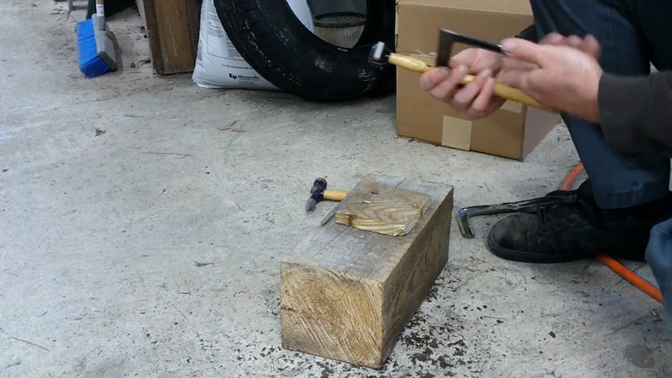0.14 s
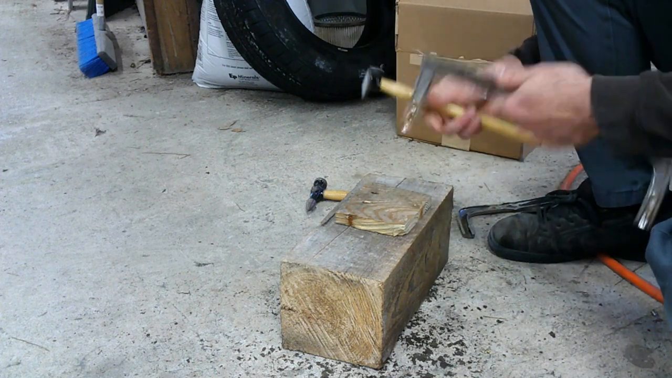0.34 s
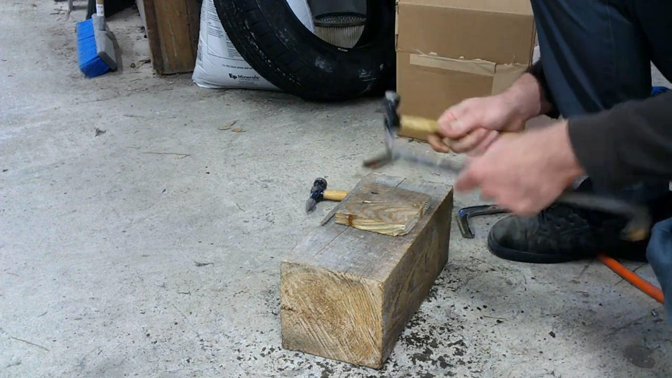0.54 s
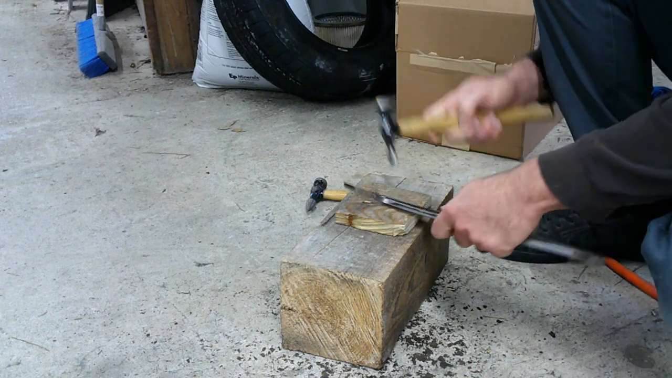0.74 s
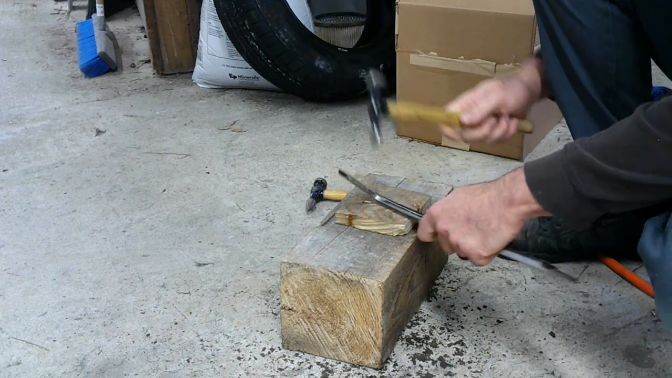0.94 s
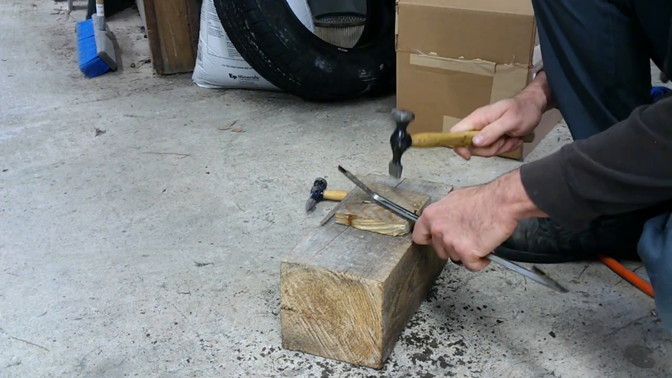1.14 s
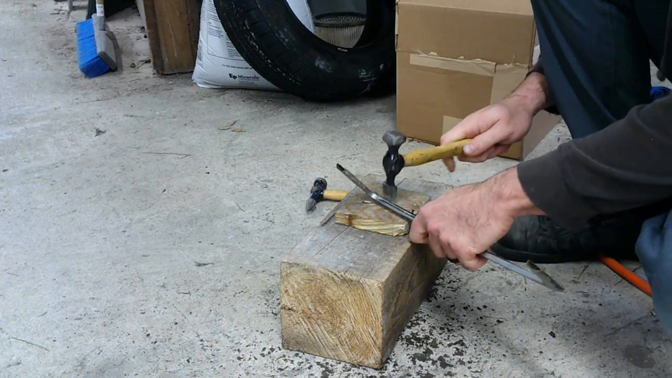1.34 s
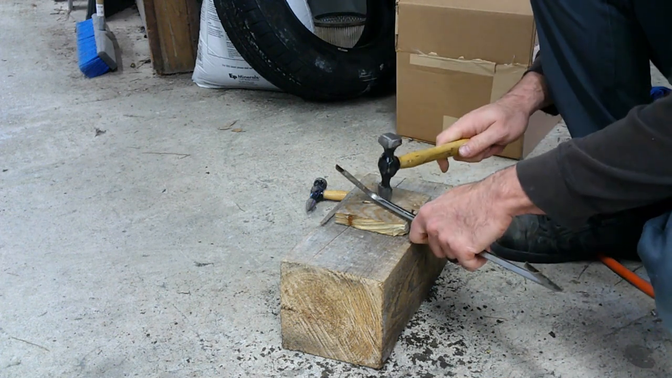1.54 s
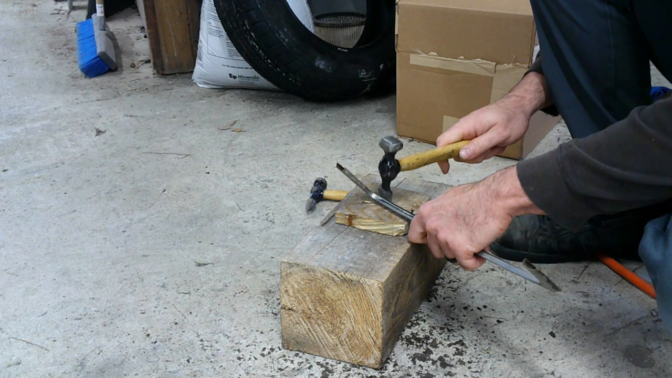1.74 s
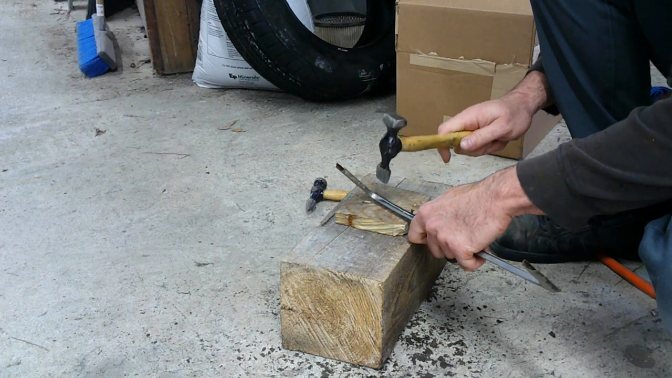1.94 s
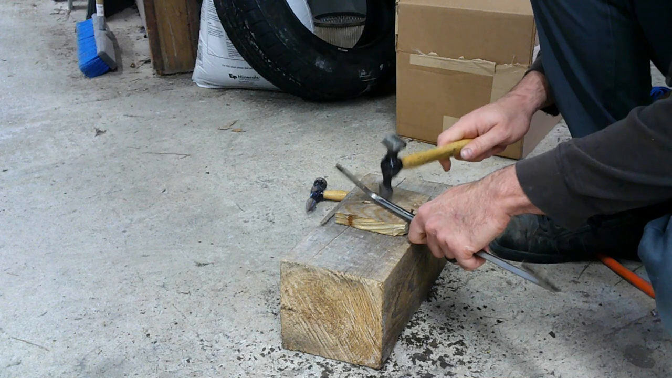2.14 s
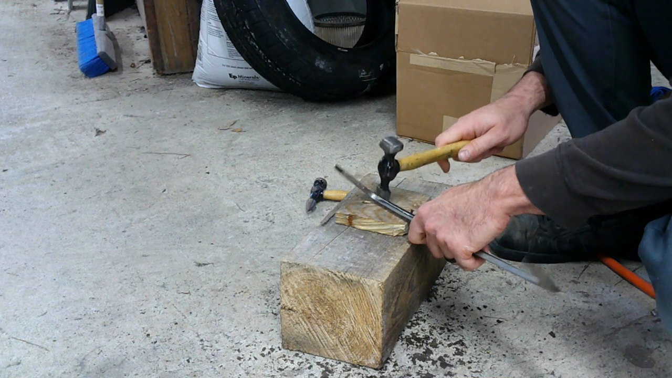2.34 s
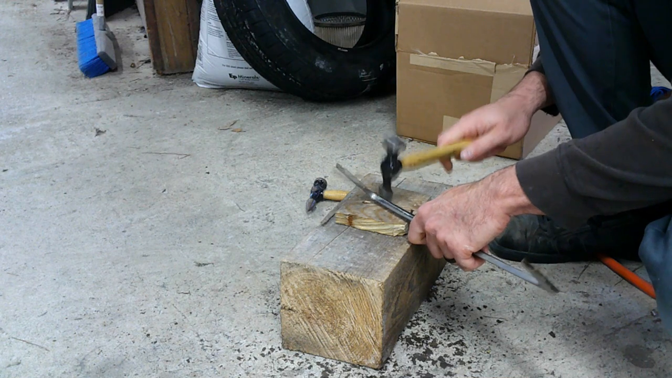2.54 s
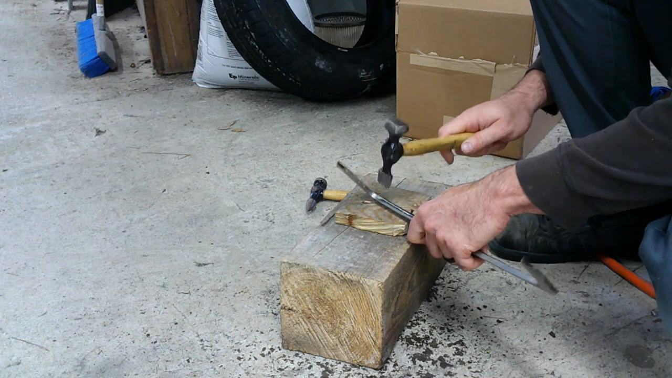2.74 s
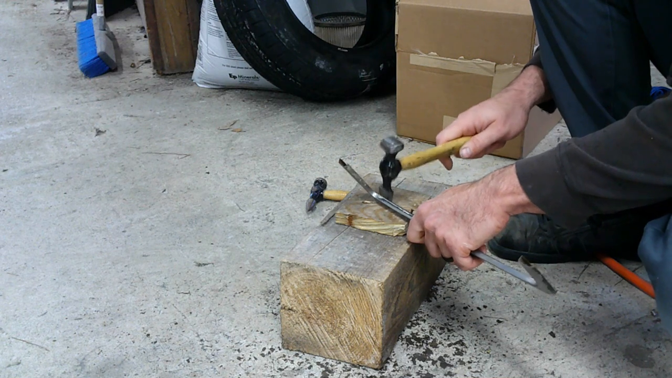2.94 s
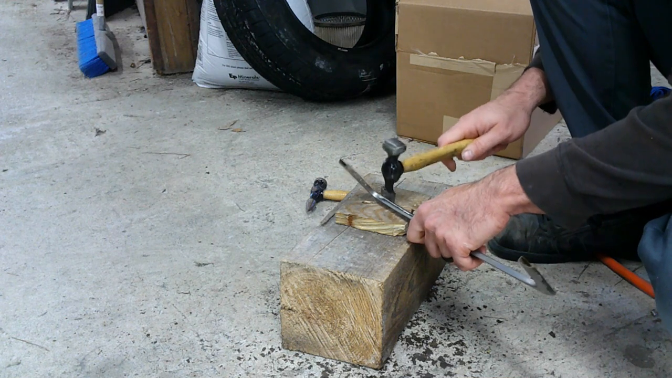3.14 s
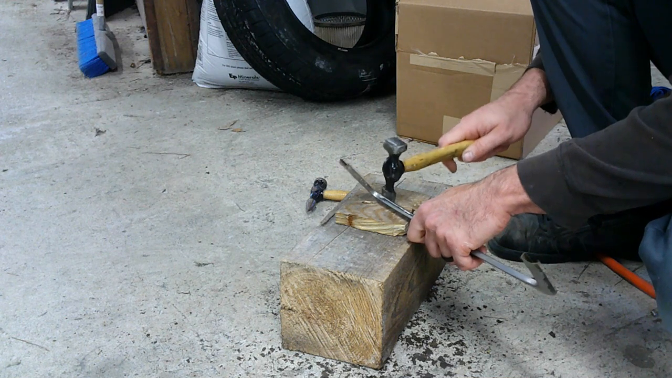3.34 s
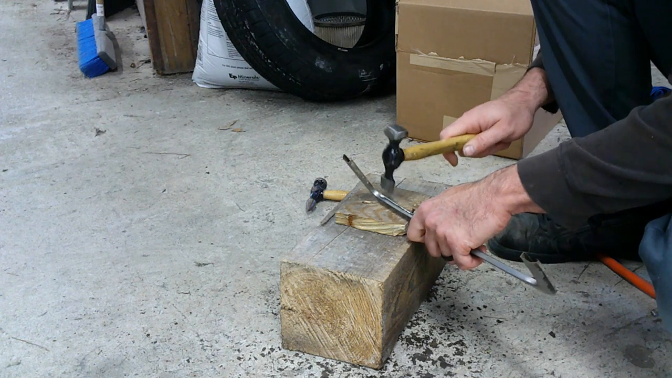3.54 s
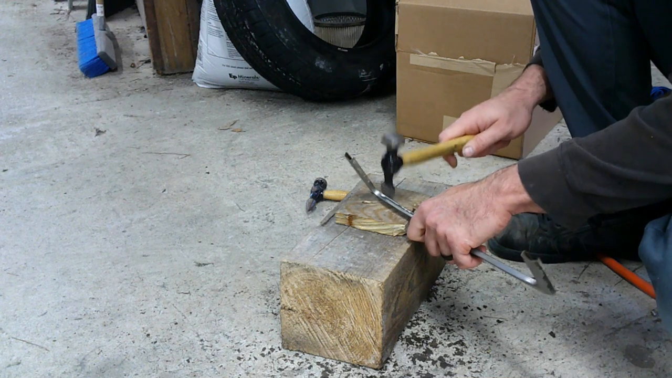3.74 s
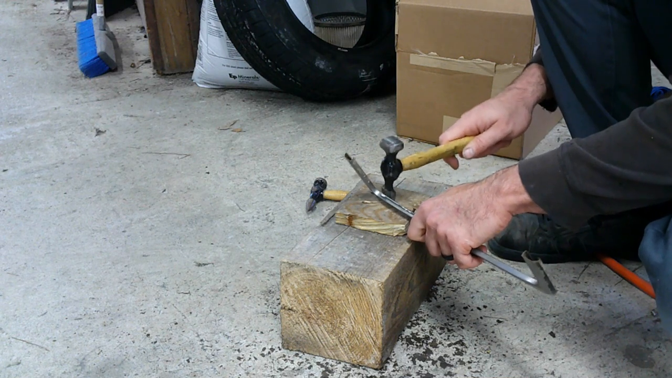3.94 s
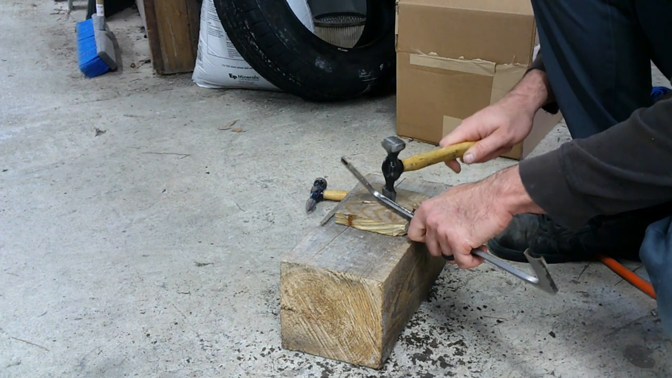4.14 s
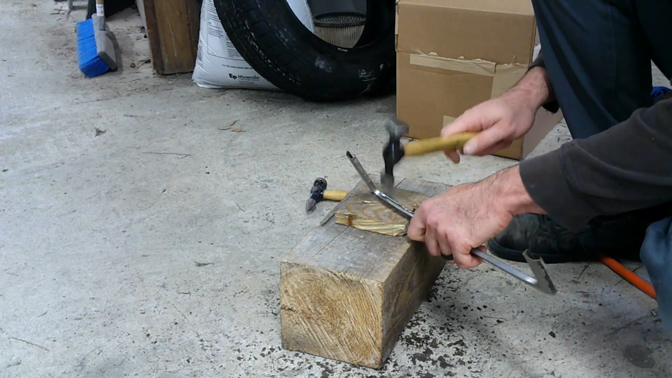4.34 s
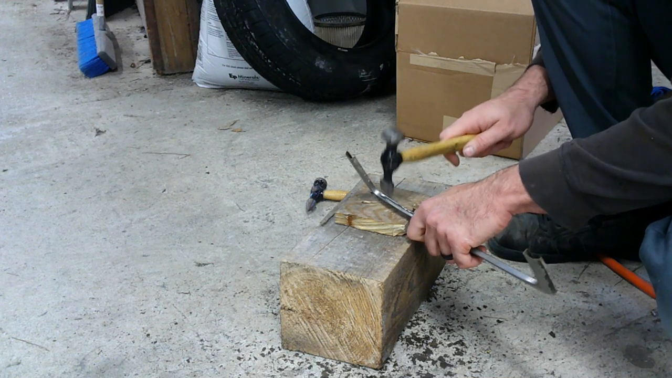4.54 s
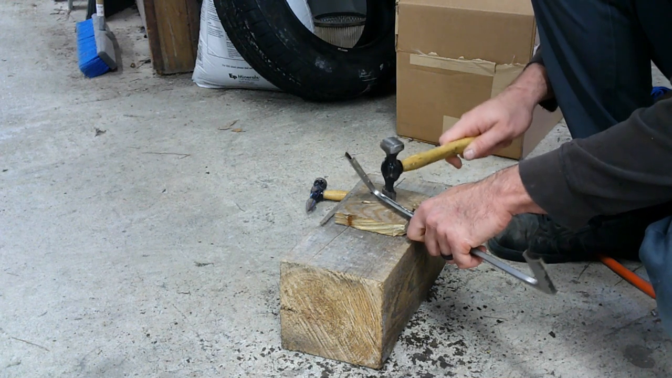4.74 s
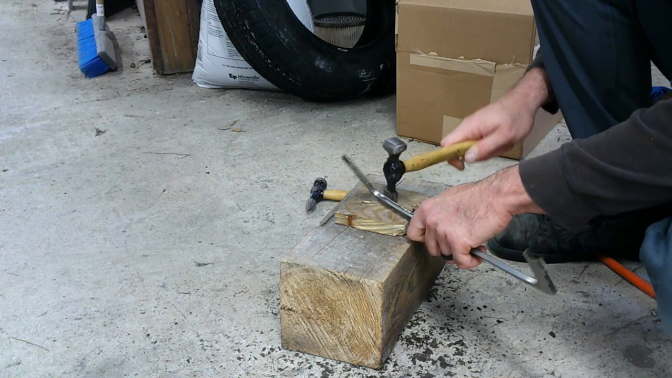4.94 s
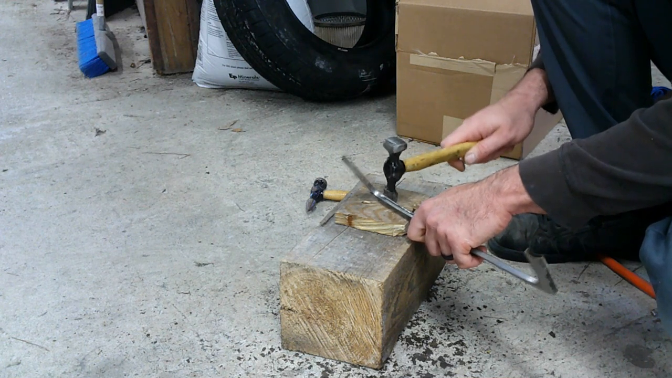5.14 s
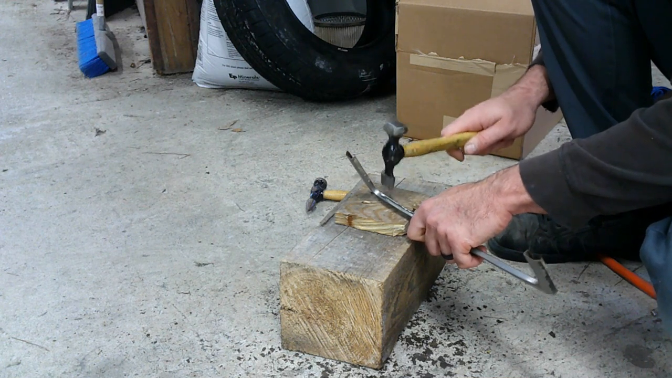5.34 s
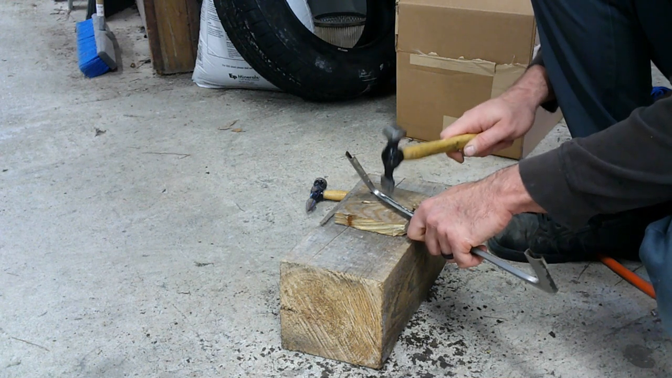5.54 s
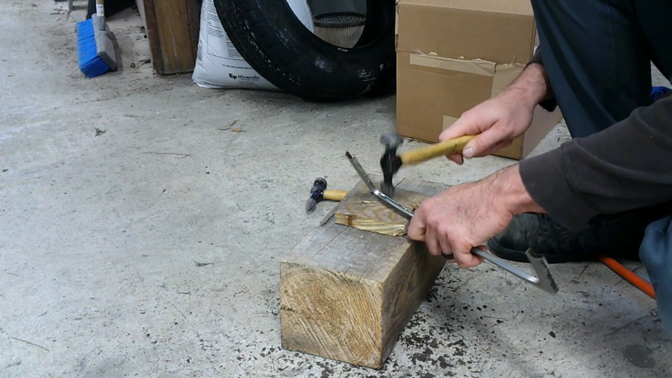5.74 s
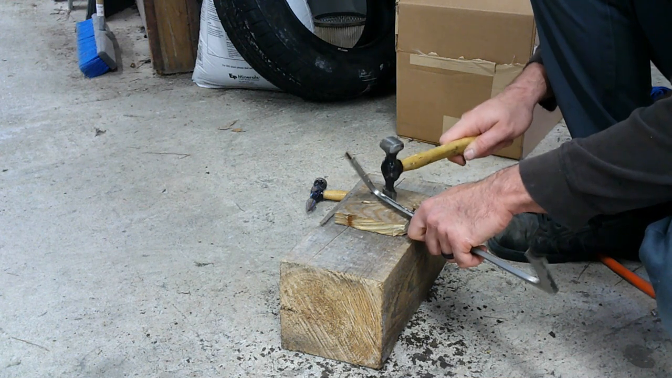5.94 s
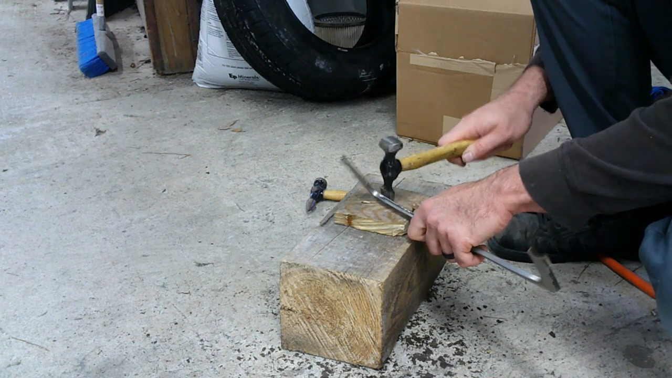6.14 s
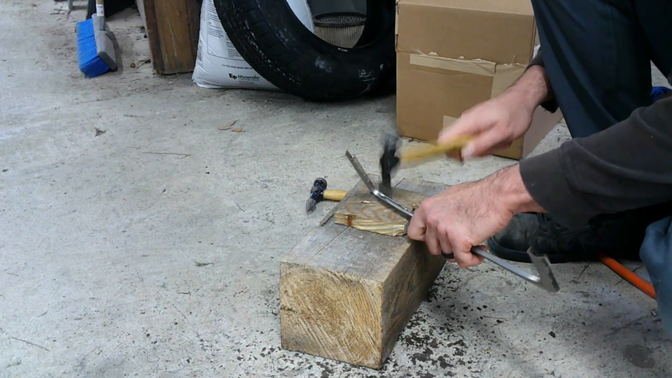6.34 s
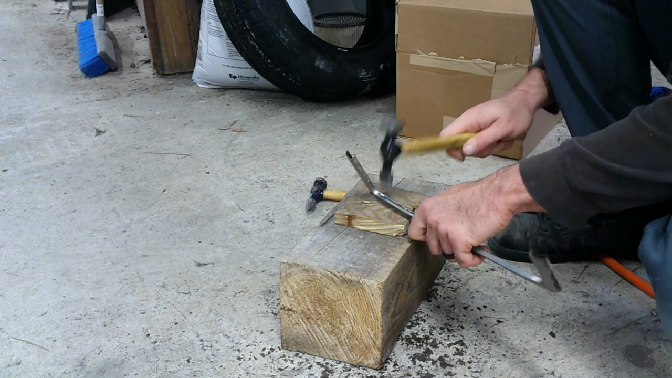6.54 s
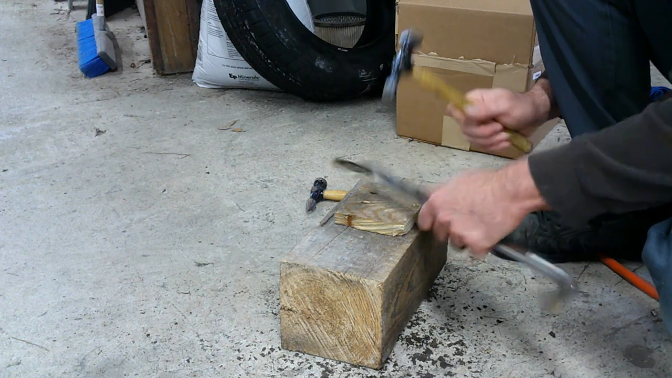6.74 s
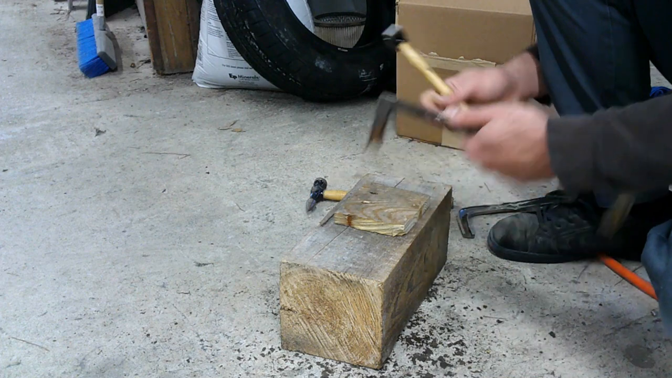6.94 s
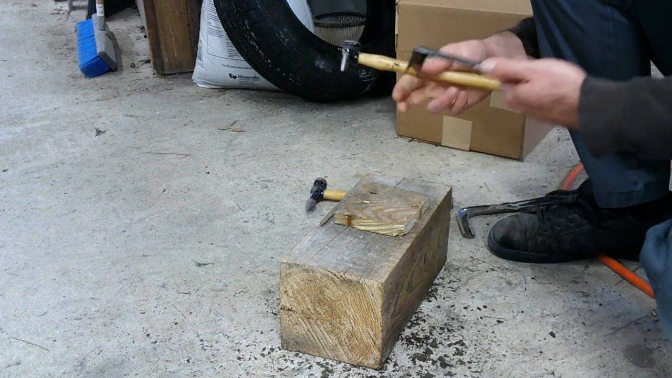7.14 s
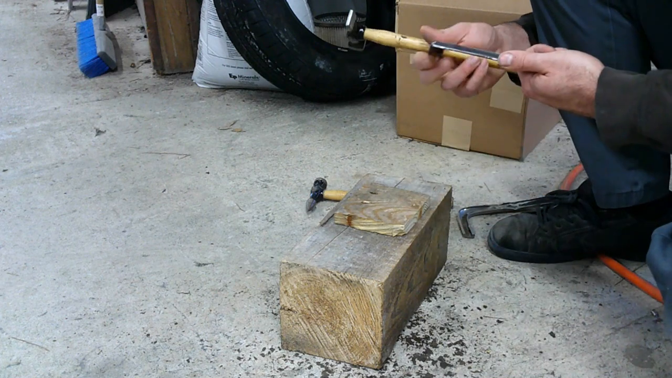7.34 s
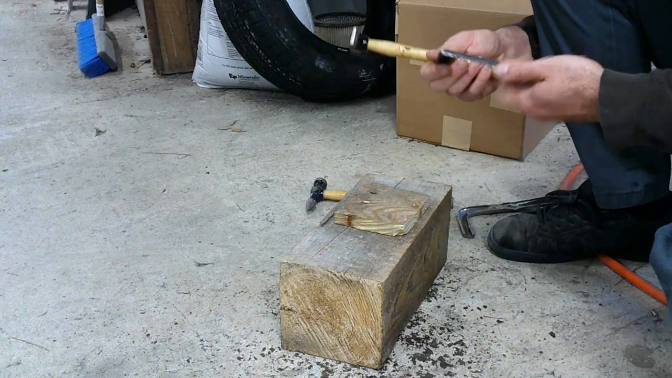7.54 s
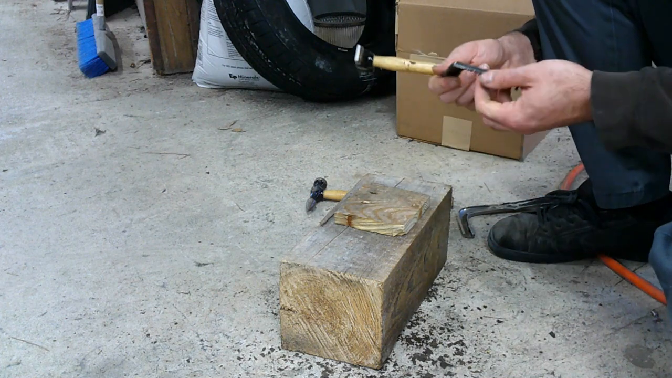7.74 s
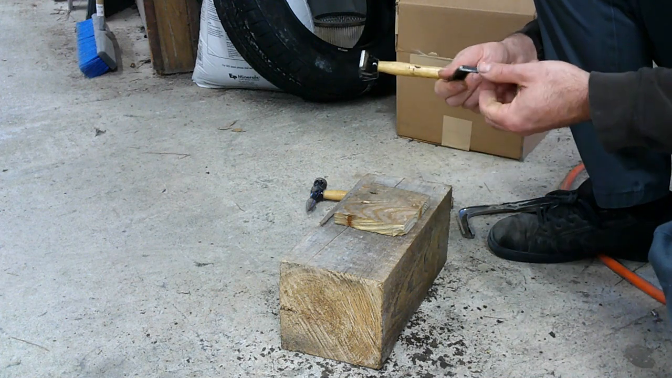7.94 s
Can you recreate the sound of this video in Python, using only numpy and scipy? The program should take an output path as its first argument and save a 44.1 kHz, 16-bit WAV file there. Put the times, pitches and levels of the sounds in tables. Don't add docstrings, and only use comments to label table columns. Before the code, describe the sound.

In a concrete garage with faint low hum and hiss, metal is handled with dry ticks and soft skin rubbing, then laid on wood. A hammer taps it steadily about four times a second, brittle and quickly damped, with a bright room tail. The blows stop and quiet rubbing and small clicks return. Close small microphone, dull at the very top, clipping on hits.

```python
import sys
import numpy as np
from scipy import signal
from scipy.fft import rfft, irfft
from scipy.io import wavfile
from scipy.ndimage import uniform_filter1d

SR = 44100
rng = np.random.default_rng(int(sys.argv[2]) if len(sys.argv) > 2 else 0)


def how_loud(loudness_db):
    steps = np.asarray(loudness_db, float) / 20
    return 10 ** steps


def dump_mix(stems):
    frames = np.atleast_2d(stems).T
    limited = np.clip(frames, -1, 1)
    pcm = np.round(limited * 32767).astype(np.int16)
    wavfile.write(sys.argv[1], SR, pcm)


N = 356328


def evened(x):
    return x / np.sqrt(np.mean(x ** 2) + 1e-20)


def read(points, hz):
    f, value = np.transpose(points)
    return np.interp(np.log(hz + 1), np.log(f + 1), value)


def add(mix, start_s, sound):
    part = mix[round(start_s * SR):][:len(sound)]
    part += sound[:len(part)]


def band(x, hz, width_hz):
    return signal.lfilter(*signal.iirpeak(hz, hz / width_hz, SR), x)


# frequency in Hz, density in dB per Hz.
AIR_SPECTRUM = [(12, -47), (22, -15.5), (60, -11), (146, -2), (230, -7.5), (500, -11), (1000, -15),
                (2000, -19), (3500, -24), (4900, -32.5), (6300, -28.5), (7600, -30.5), (9000, -51),
                (11000, -98)]


def air():
    level_db, patch_db = -54, 2.6
    frames, hz = N // 256 + 5, np.fft.rfftfreq(1024, 1 / SR)
    real, imag, patches = rng.standard_normal((frames, 513, 3)).T
    patches = uniform_filter1d(patches, 12, 0)
    patches = evened(uniform_filter1d(patches, 14, 1))
    steady_bass = np.minimum(hz / 900, 1)[:, None]
    colour_db = read(AIR_SPECTRUM, hz)[:, None] + patch_db * patches * steady_bass
    z = (real + 1j * imag) * how_loud(colour_db)
    noise = signal.istft(z, nperseg=1024, noverlap=768)[1][:N]
    return how_loud(level_db) * evened(noise)


# time in seconds, pressure in dB.
RUB_PRESSURES = [
    [(0.0, -61), (0.126, -64), (0.378, -62), (0.578, -60.5), (0.72, -63.5), (1.0, -69), (1.222, -82),
     (1.7, -73)],
    [(6.6, -54), (6.7, -63), (6.806, -63), (6.97, -60.5), (7.148, -65), (7.408, -72), (7.704, -62),
     (7.91, -76), (8.08, -84)],
]
# frequency in Hz, width in Hz.
RUB_RESONANCES = [(3000, 2000), (6400, 2400)]
# frequency in Hz, width in Hz, level in dB.
SUNG_MODES = [(3400, 69, -7), (3720, 110, -7), (5350, 120, -13), (6340, 140, -6.5), (6900, 140, -5)]


def rubs():
    high_db, sung_db = -4, 2.0
    t = np.arange(N) / SR
    grip_db = evened(uniform_filter1d(rng.standard_normal(N), 300))
    grain = rng.standard_normal(N) * how_loud(grip_db)
    for hz, width_hz, db in SUNG_MODES:
        grain = grain + how_loud(db + sung_db) * band(grain, hz, width_hz)
    low, high = (evened(band(band(grain, *r), *r)) for r in RUB_RESONANCES)
    pressure = sum(how_loud(np.interp(t, *np.transpose(rows), -120, -120)) for rows in RUB_PRESSURES)
    return pressure * (low - how_loud(high_db) * high)


def click(peak_db, hz, width_hz, upper_db, length_s):
    upper_hz, upper_width_hz = 6300, 1600
    t = np.arange(6000) / SR
    envelope = np.minimum(t / (0.34 * length_s), 1) * np.exp(-t / length_s)
    scrape = rng.standard_normal(6000) * envelope
    low = evened(band(band(scrape, hz, width_hz), hz, width_hz))
    high = evened(band(band(scrape, upper_hz, upper_width_hz), upper_hz, upper_width_hz))
    sound = low - how_loud(upper_db) * high
    peak = np.sqrt(np.max(uniform_filter1d(sound ** 2, 100)))
    return how_loud(peak_db) * sound / peak


# start in seconds, peak in dB, upper ring in dB, length in seconds.
TICKS = [(0.017, -42, -7, 0.015), (.199, -38.5, -20, .0042), (.206, -43, -16, .002),
         (0.227, -31, -17, 0.0057), (0.309, -50, -28, 0.0041), (0.315, -32, -23, 0.0073),
         (0.339, -40, -30, 0.0047), (0.361, -34, -28, 0.0015), (0.363, -51, -18, 0.0029),
         (1.533, -51, -21, .004), (1.546, -53, -21, 0.0093), (2.349, -19.5, -12.5, .004),
         (6.807, -43, -21, .0035), (6.815, -38.5, -16, 0.0085), (6.939, -52, -14, .0033),
         (7.807, -46, -4, 0.02), (7.895, -53, -1.5, .0047)]
# start in seconds, peak in dB, ring in Hz, length in seconds.
PINGS = [
    (1.209, -58, 6100, .004),
    (7.372, -56, 3650, 0.015),
    (7.396, -59, 3700, .011),
    (7.826, -55, 2060, .015),
]
# start in seconds, peak in dB, ring in Hz, length in seconds.
SHIFTS = [
    (1.302, -46, 690, .039),
    (1.34, -53, 940, .068),
]


def hands():
    out = np.zeros(N)
    for start_s, peak_db, upper_db, length_s in TICKS:
        add(out, start_s, click(peak_db, 2870, 1630, upper_db, length_s))
    out = out + how_loud(3.4) * band(out, hz=3420, width_hz=53)
    for start_s, peak_db, hz, length_s in PINGS:
        add(out, start_s, click(peak_db, hz, 0.117 * hz, -5, length_s))
    for start_s, peak_db, hz, length_s in SHIFTS:
        add(out, start_s, click(peak_db, hz, 930, -24, length_s))
    return out


def power(modes, hz, spot):
    spread_db, detune = 2.64, 0.012
    mode_hz, db, t60_s = np.transpose(modes)[:, :, None]
    strength, pitch = spot[:, :len(modes), None]
    half_width_hz = np.log(1000) / (2 * np.pi * t60_s)
    centre_hz = mode_hz * (1 + detune * pitch)
    resonance = 1e4 / (half_width_hz ** 2 + (hz - centre_hz) ** 2)
    return (how_loud(db + spread_db * strength) ** 2 * resonance).sum(0)


def ring(p):
    log_gain = np.log(np.r_[p, p[-2:0:-1]]) / 2
    return np.fft.ifft(np.exp(np.conj(signal.hilbert(log_gain)))).real[:len(p) - 1]


# frequency in Hz, level in dB, t60 in seconds.
BLOCK_MODES = [(147, -14, 0.025), (224, -1, 0.036), (260, -15.5, 0.18), (314.5, -1, 0.061),
               (411, -5.5, 0.052), (526, 1, 0.032)]


def blow(strength_db, bite_db, block_db, strip):
    thud_db, rise_s, chatter_s, release_s = 3.0, 0.00036, 0.006, 0.00027
    edge_hz, edge_width_hz, edge_share = 2220, 3900, 0.27
    hz, t = np.fft.rfftfreq(8192, 1 / SR), np.arange(500) / SR
    spot = rng.standard_normal((2, 10))
    wood = how_loud(block_db) ** 2 * power(BLOCK_MODES, hz, spot) + 1e-9
    steel = sum(how_loud(db) ** 2 * power(modes, hz, spot) for db, modes in strip) + 1e-9
    thud = np.convolve(ring(wood), np.hanning(90) / 45)[:4096]
    contact = np.minimum(t / rise_s, 1) ** 2 / (1 + np.exp((t - chatter_s) / release_s))
    z = rfft(rng.standard_normal(500) * contact)
    chatter = irfft(z / abs(z) ** .7, 500) * contact
    chatter = (1 - edge_share) * chatter + edge_share * 2 * band(chatter, edge_hz, edge_width_hz)
    chatter /= np.linalg.norm(chatter)
    bite = signal.fftconvolve(chatter, ring(steel))[:4096]
    direct = how_loud(bite_db) * bite + how_loud(thud_db) * thud
    gain = how_loud(strength_db + 19.5) / np.sqrt(np.mean(wood + steel))
    return gain * direct, gain * ring(wood + steel)


# frequency in Hz, level in dB, t60 in seconds.
FREE_MODES = [(1390, -4.5, 0.019), (1550, -2, 0.014), (1800, -7, .01), (2500, -0.5, 0.0075),
              (2960, -1, .008), (3400, -4, 0.0072), (3840, -2, 0.0071), (4530, -8, 0.0043),
              (5960, -9.5, 0.0076), (6860, -24, 0.0046)]


def lay_down():
    return [(0.7425, *blow(strength_db=-23, bite_db=2.3, block_db=-28, strip=[(0, FREE_MODES)]))]


# frequency in Hz, level in dB, t60 in seconds.
TAPPED_MODES = [(800, -4.5, .01), (1500, -5, 0.0087), (2600, -1, 0.01), (3300, -5, .02),
                (3940, -6.5, 0.012), (6530, -3, 0.0046)]


def light_tap():
    return [(1.7308, *blow(strength_db=-26.5, bite_db=3.4, block_db=-7.5, strip=[(0.0071, TAPPED_MODES)]))]


# start in seconds, strength in dB, block in dB, flex of the loose strip in dB,
# strip mode favoured by the landing spot in Hz.
BLOWS = [(2.041, -7, -4.5, -7, 3380), (2.309, -7.5, -4.5, -7.5, 2960), (2.561, -4.5, -4, -8, 3200),
         (2.824, -1, -12, -6.5, 3140), (3.088, -4.5, -8.5, -3, 2980), (3.344, -3.5, -9, -1.5, 3270),
         (3.602, -4.5, -5, -2, 3470), (3.861, -3.5, -8, -1, 2020), (4.126, 1.5, -7, -0.5, 2000),
         (4.392, 1, -6.5, -5.5, 3026), (4.654, -0.5, -5.5, -4.5, 1960), (4.907, -3, -12, -4.5, 1487),
         (5.145, -2, -11.5, -1, 1980), (5.403, -3, -10, 0.5, 2075), (5.625, 0.5, -13.5, -2.5, 1965),
         (5.866, -6, -1.5, 1.5, 2150), (6.114, 0.5, -8, -1, 800), (6.369, 1, -11, -3.5, 1957)]
# frequency in Hz, level in dB, t60 in seconds.
BEND_MODES = [(781.5, -1, 0.019), (965, 1, 0.011), (1180, -2.5, 0.0073), (1456, -1.5, 0.013),
              (547, -8.5, .03)]
# frequency in Hz, level in dB, t60 in seconds.
CLANG_MODES = [(1772, 6, 0.0062), (1994, -6, 0.017), (2400, -1, 0.0089), (2474, 1, 0.0089),
               (3336, -10, 0.044), (6000, -10, 0.037)]
# frequency in Hz, level in dB, t60 in seconds.
EDGE_MODES = [(2670, -11.5, 0.014), (3034, 6.5, 0.0039), (3812, -3, 0.013), (4240, 0.5, 0.009),
              (4620, -4, 0.0037), (5310, -3, 0.0087), (5600, 1.5, 0.0054), (6244, 1, 0.009),
              (6910, -1, 0.0039), (7400, -21, 0.0023)]


def hammer_blows():
    hits = []
    for start_s, strength_db, block_db, flex_db, favoured_hz in BLOWS:
        favoured_db = -1.5 + 0.05 * flex_db
        favoured_t60_s = 0.033 * np.exp(0.19 * flex_db)
        favoured = [(favoured_hz, favoured_db, favoured_t60_s)]
        strip = [(flex_db, BEND_MODES), (flex_db + 0.9, CLANG_MODES), (0, EDGE_MODES), (0, favoured)]
        bite_db = min(1.56 - 0.44 * strength_db, 3)
        hits.append((start_s, *blow(strength_db, bite_db, block_db, strip)))
    return hits


# frequency in Hz, t60 in seconds.
GARAGE_T60 = [(100, 0.78), (260, 0.21), (700, 0.49), (1840, 0.62), (3500, 0.48), (6000, 0.42), (9000, 0.31)]
# delay in seconds, level in dB.
ECHOES = [(.0021, -7), (.0046, -11), (0.0137, -12), (0.0157, -12.5), (.027, -16), (.045, -19)]


def garage(direct, spread):
    tail_db = -1.5
    taps, echoes = np.zeros(SR), np.zeros(SR // 10)
    at = np.arange(350, SR - 20, 10)
    at = at + rng.integers(0, 10, len(at))
    taps[at] = rng.choice([-1., 1.], len(at))
    hz, t, z = signal.stft(taps, SR, nperseg=256)
    decay = how_loud(-60 * t / read(GARAGE_T60, hz)[:, None])
    tail = signal.istft(z * decay, SR, nperseg=256)[1]
    tail = how_loud(tail_db) * tail / np.linalg.norm(tail)
    for delay_s, db in ECHOES:
        add(echoes, delay_s * rng.uniform(0.92, 1.05), how_loud(db) * rng.choice([-1., 1.], 1))
    early = signal.oaconvolve(direct, echoes)[:N]
    late = signal.fftconvolve(spread, tail)[:N]
    return direct + early + late


def scene():
    flight_s, hands_room_db = 0.0004, -7.0
    direct, spread = np.zeros((3, N)), np.zeros((3, N))
    rubbed, held = rubs(), hands()
    hits = lay_down() + light_tap() + hammer_blows()
    for k, (start_s, near, ringing) in enumerate(hits):
        add(direct[k % 3], start_s + flight_s, near)
        add(spread[k % 3], start_s, ringing)
    spread[0] += how_loud(hands_room_db) * held
    room = sum(garage(*path) for path in zip(direct, spread))
    return (room + held + rubbed)[None]


def roll_off(x):
    return signal.sosfilt(signal.butter(12, 17090, fs=SR, output="sos"), x)


def record(dry):
    bass_hz, top_hz, coupling_hz = 120, 8050, 70
    squash_db, clip_db = -3.5, -3.0
    ported = dry - 0.32 * band(dry, hz=5000, width_hz=1000)
    bottom = signal.butter(2, bass_hz, "high", fs=SR, output="sos")
    level = signal.sosfilt(bottom, ported) / how_loud(squash_db)
    squashed = how_loud(squash_db) * level / (1 + level ** 6) ** (1 / 6)
    top = signal.cheby1(8, .5, top_hz, fs=SR, output="sos")
    coupling = signal.butter(1, coupling_hz, "high", fs=SR, output="sos")
    heard = signal.sosfilt(np.vstack([top, coupling]), squashed) + air()
    clipped = np.clip(heard, -how_loud(clip_db), how_loud(clip_db))
    return roll_off(clipped)


dry = scene()
out = record(dry)
dump_mix(out)
```